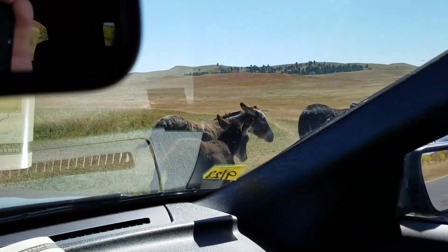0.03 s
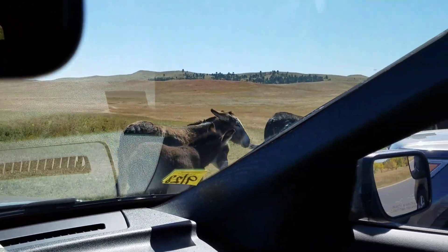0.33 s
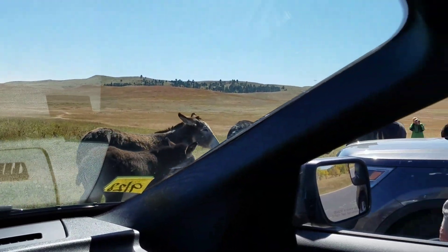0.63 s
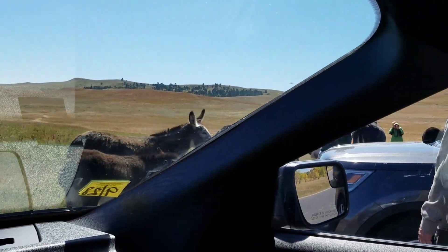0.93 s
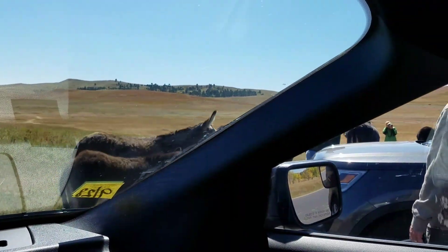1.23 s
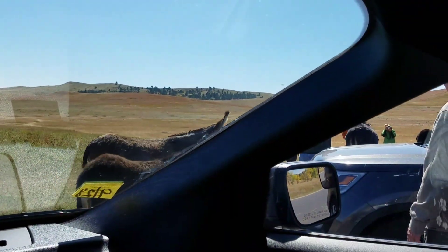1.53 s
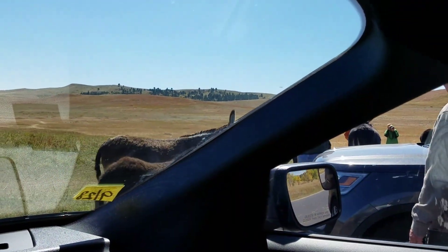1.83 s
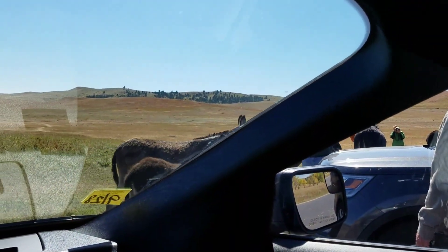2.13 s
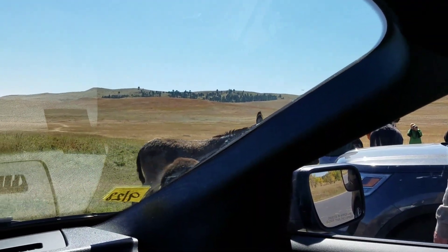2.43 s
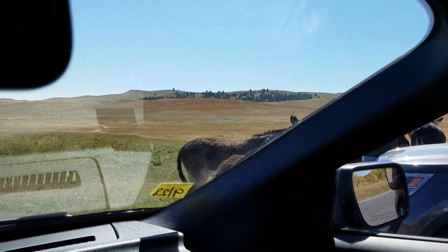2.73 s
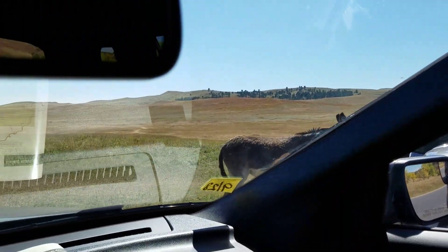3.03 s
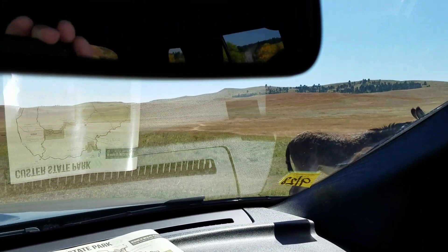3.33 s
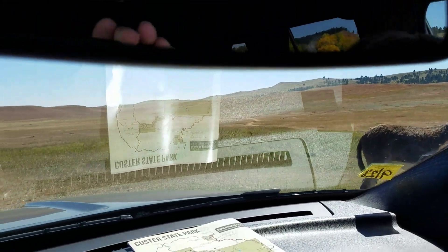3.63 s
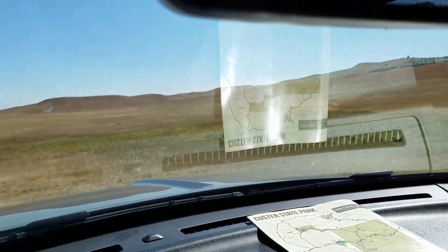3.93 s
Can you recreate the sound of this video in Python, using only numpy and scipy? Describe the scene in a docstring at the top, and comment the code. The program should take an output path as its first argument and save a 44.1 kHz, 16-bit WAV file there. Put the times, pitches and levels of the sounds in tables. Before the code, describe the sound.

Heard from the front seat, a car's electric window whirs up and thumps into its seal, shutting out the hiss from outside. The switch clicks, then the engine rumbles on under a soft ventilation hum and light handling clicks.

```python
"""A car idles under a soft ventilation hum; outside hiss pours through a window as its motor runs it up.
From 0.4 s the gap pinches shut, its resonance sweeps upward and the glass rubs into the rubber seal.
At 0.48 s hiss and motor stop and the glass thumps home, ringing the door. The switch clicks back.
The engine throbs on, with a few small handling clicks; near 3.5 s a faint drone joins under load."""
import sys
import numpy as np
from scipy import signal
from scipy.fft import rfft, irfft
from scipy.io import wavfile

SR = 44100
rng = np.random.default_rng(int(sys.argv[2]) if len(sys.argv) > 2 else 0)


def digitize_waveform(pressure):
    """Quantize a signal to 16-bit integers and store it at the path in sys.argv[1].

    Rows of a 2-D input are taken as channels; values are limited to [-1, 1].
    """
    field = np.atleast_2d(pressure).T
    bounded = np.clip(field, -1, 1)
    quanta = np.round(bounded * 32767).astype(np.int16)
    wavfile.write(sys.argv[1], SR, quanta)


N = 176400
T, HZ = np.arange(N) / SR, np.maximum(np.arange(N // 2 + 1) * SR / N, 1)


def from_db(db):
    """Decibels to gain."""
    return 10 ** (np.asarray(db) / 20)


def unit_rms(x):
    """Scale to unit rms."""
    return x / np.sqrt(np.mean(x ** 2) + 1e-20)


def in_time(rows):
    """Each column of a time table at every sample."""
    t_s, *columns = np.transpose(rows)
    return [np.interp(T, t_s, column) for column in columns]


def by_hz(rows):
    """A spectrum table at every bin, interpolated in log f."""
    hz, value = np.transpose(rows)
    return np.interp(np.log(HZ), np.log(hz), value)


def pan(db):
    """Constant-power gains for an L-R level difference."""
    gains = from_db(np.array([[.5], [-.5]]) * db)
    return gains / np.sqrt(np.mean(gains ** 2, axis=0))


def drift(corner_hz):
    """Low-passed random wander, unit rms."""
    return unit_rms(irfft(rfft(rng.standard_normal(N)) / (1 + (HZ / corner_hz) ** 2), N))


def resonance(hz, q):
    """Gain of two equal band-passes in series, at every bin."""
    return 1 / (1 + (q * (HZ / hz - hz / HZ)) ** 2)


def struck(age_s, rise_s, t60_s):
    """Envelope of a blow: quick rise, exponential decay."""
    return (1 - np.exp(-age_s / rise_s)) * from_db(-60 * np.minimum(age_s / t60_s, 4))


def tones(rows, flutter_db, wander):
    """Wavering tones; L-R phase spread grows with frequency up to 1 kHz."""
    out = 0
    for hz, db, width_hz in rows:
        phase = 2 * np.pi * np.cumsum(hz + wander * width_hz * drift(2 * width_hz + 1)) / SR
        spread_rad = min(hz / 1000, 1) * np.array([drift(3.8), drift(5.6)])
        out += np.sqrt(2) * from_db(db + flutter_db * drift(24)) * np.sin(phase + spread_rad)
    return out


# Stereo width of the noise, centred in the bass, wide in the treble: f/Hz, centring (1 = mono)
NOISE_CENTRING = [(50, 1), (130, 0.68), (290, 0.84), (640, 0.41), (1300, 0.18), (3000, -0.034),
                  (16000, -0.34)]


def noise(gain):
    """Stereo noise of given gain per root Hz, centred in the bass, wide in the treble."""
    mid, side = rfft(rng.standard_normal((2, N)))
    centring = np.clip(by_hz(NOISE_CENTRING), -.999, .999)
    spectrum = np.sqrt(1 + centring) * mid + np.sqrt(1 - centring) * side * [[1], [-1]]
    return irfft(gain * spectrum, N) * np.sqrt(SR) / 2


# Rumble and ventilation air: f/Hz, density/(dB per Hz)
CABIN_AIR = [(15, -88.5), (30, -71), (70, -73), (100, -79.5), (135, -75.5), (185, -86), (230, -78.5),
             (270, -84), (320, -82.5), (390, -83), (470, -81.5), (560, -85.5), (760, -90), (840, -95.5),
             (980, -90), (1100, -99), (1900, -102), (3000, -108), (6000, -115), (16000, -119)]
# Air balance: f/Hz, L-R/dB
CABIN_BALANCE = [(60, -4.5), (150, -0.5), (950, -2), (2400, -3.5), (6000, -2.5), (15000, 6.5)]
# Belt and ventilation hums: f/Hz, level/dB, width/Hz
CABIN_HUMS = [(103.75, -57, 1.57), (174.9, -69.5, 0.84), (207.8, -59, 0.39), (421.2, -68.5, 6),
              (705.6, -73, 1.52), (923, -73, 4.2)]


def cabin(flicker_db=1.0):
    """Rumble and ventilation air under the hums of belt drive and ventilation."""
    air = noise(from_db(by_hz(CABIN_AIR)) * pan(by_hz(CABIN_BALANCE)))
    return air * from_db(flicker_db * drift(6.9)) + tones(CABIN_HUMS, flutter_db=1.5, wander=.86)


# Engine orders: multiple of firing rate, level/dB
ENGINE_ORDERS = [(1, -36.3), (1.5, -53.5), (2, -55.5), (3, -53), (4, -64)]
# Boom over time: t/s, gain/dB
ENGINE_BOOM = [(0, 0), (.45, -1.5), (1.0, -2.5), (1.7, -2.1), (2.35, -3.8), (2.8, -3), (3.4, -2.5),
               (3.7, -0.5), (4, 1.5)]


def engine(firing_hz=30.5, speed_wander=.0043, steady_db=1.03, shake_db=2.5):
    """The firing rate booms steadily in the cabin; its higher orders shake."""
    phase = 2 * np.pi * np.cumsum(firing_hz * (1 + speed_wander * drift(3.2))) / SR
    out = 0
    for order, db in ENGINE_ORDERS:
        flutter_db = (steady_db if order == 1 else shake_db) * drift(7)
        out += from_db(db + flutter_db) * np.sin(order * phase + rng.uniform(0, 2 * np.pi))
    return np.sqrt(2) * out * from_db(in_time(ENGINE_BOOM)[0]) * pan(1.5)


def load_drone(mid_s=3.46, rise_s=.14, hz=322, level_db=-61.5):
    """A narrow cabin resonance grows as the engine takes up load."""
    swell = (1 + np.tanh((T - mid_s) / rise_s)) / 2
    return unit_rms(noise(resonance(hz, q=7.8))) * from_db(level_db) * swell


# Plastic clicks: t/s, level/dB, f/Hz, t60/s, rise/s, crack re ring/dB, L-R/dB
PLASTIC_CLICKS = [(.4635, -57, 14600, 0.027, .0005, -15, 9), (.546, -55.5, 2100, 0.056, 0.0023, -20, -2),
                  (0.589, -50.5, 2280, 0.072, 0.0012, -7.5, -6), (.588, -58.5, 11700, 0.051, .0005, -18, 5),
                  (0.597, -41, 420, 0.082, 0.0023, -30, -2), (.74, -67, 6170, 0.05, 0.0011, -8, -4),
                  (1.362, -70, 5500, 0.062, .002, 9, 0), (1.378, -57, 2030, 0.059, 0.0017, -10, -5),
                  (1.723, -66.5, 3500, 0.06, .002, -6, -6), (2.619, -63, 1380, 0.017, .0005, -14, -3),
                  (3.379, -47, 1590, 0.12, 0.00059, -25, -3), (3.384, -48.5, 755, 0.13, 0.0022, -21, -2),
                  (3.389, -59.5, 5670, 0.18, 0.0087, 0, -5),
                  (3.4155, -51.5, 5500, 0.047, 0.00067, -10.5, -3)]


def clicks(crack_low_hz=1000, crack_top_hz=6750, direct_t60_s=.014):
    """Switch and handling clicks: a broad crack and one ring, direct and then scattered by the cabin."""
    out = np.zeros((2, N))
    crack = unit_rms(noise(HZ / (HZ + crack_low_hz) / np.sqrt(1 + (HZ / crack_top_hz) ** 6)))
    for t_s, db, hz, t60_s, rise_s, crack_db, pan_db in PLASTIC_CLICKS:
        age_s = np.maximum(T - t_s, 0)
        body = unit_rms(noise(resonance(hz, q=2.67))) + from_db(crack_db) * crack
        envelope = struck(age_s, rise_s, direct_t60_s) + struck(age_s, rise_s, t60_s)
        out += body * envelope * from_db(db) * pan(pan_db)
    return out


# Motor pitch: t/s, f/Hz
MOTOR_PITCH = [(0, 508), (.2, 508), (.32, 508.3), (.39, 499), (.45, 487.5), (.49, 450)]
# Motor harmonics: multiple, level/dB, L-R/dB
MOTOR_HARMONICS = [(1, -60, 31), (2, -72, -10), (3, -65.5, -16)]


def window_motor(jitter=.003, flutter_db=2):
    """The motor whines, slowing as the glass meets the seal."""
    phase = 2 * np.pi * np.cumsum(in_time(MOTOR_PITCH)[0] * (1 + jitter * drift(30))) / SR
    return sum(np.sqrt(2) * from_db(db + flutter_db * drift(27)) * np.sin(k * phase) * pan(pan_db)
               for k, db, pan_db in MOTOR_HARMONICS)


# Outside hiss: f/Hz, density/(dB per Hz)
GAP_AIR = [(100, -90), (300, -78.5), (600, -91), (1050, -89.5), (1330, -98), (1600, -90.5), (2300, -92),
           (4100, -89.5), (5200, -99), (7700, -102), (9000, -111), (12000, -109), (15000, -109)]
# Hiss balance: f/Hz, L-R/dB
GAP_BALANCE = [(300, -2.5), (950, -6), (2400, -3.5), (6000, -5.5), (12000, 3)]
# Whines on the hiss: f/Hz, level/dB, width/Hz
GAP_WHINES = [(2326, -70, 15), (2194, -76, 8), (2320, -81, 7.2), (2513, -76, 8), (2760, -78, 8.6),
              (2928, -79, 16), (3350, -94, 8)]


def gap_hiss():
    """Outside hiss enters through the open gap, carrying thin whines."""
    hiss = noise(from_db(by_hz(GAP_AIR)) * pan(by_hz(GAP_BALANCE)))
    return hiss + tones(GAP_WHINES, flutter_db=2.5, wander=1) * pan(-5)


# Gap resonance: t/s, level/dB (before gain_db), f/Hz
PINCH_SWEEP = [(.39, -72, 2400), (.425, -58, 2700), (.447, -49, 3300), (.459, -48, 4700), (.471, -53, 6400),
               (.487, -60, 6600), (.515, -80, 6600)]


def gap_pinch(q=3.9, gain_db=-3.5, skirt_db=-37, rough_db=3.5, block=64):
    """Air squeezed by the closing gap: its resonance swells and sweeps upward."""
    db, hz = in_time(PINCH_SWEEP)
    white = rng.standard_normal((2, N))
    out, state = np.zeros((2, N)), np.zeros((2, 2))
    for i in range(0, int(PINCH_SWEEP[-1][0] * SR), block):
        radius = np.exp(-np.pi * hz[i] / q / SR)
        b = np.sqrt((1 - radius ** 2) / 2) * np.array([1, 0, -1])
        a = [1, -2 * radius * np.cos(2 * np.pi * hz[i] / SR), radius ** 2]
        band, state = signal.lfilter(b, a, white[:, i:i + block], zi=state)
        out[:, i:i + block] = band + from_db(skirt_db) * white[:, i:i + block]
    return out * from_db(gain_db + db - rough_db * drift(150)) * pan(-4.5)


def seal_rub(peak_s=.446, swell_s=.025, fade_s=.022, level_db=-41.5):
    """Rubber swishes and squeaks against the glass, swelling until the edge is in the channel."""
    envelope = np.exp(-np.maximum(peak_s - T, 0) / swell_s - np.maximum(T - peak_s, 0) / fade_s)
    swish = resonance(hz=2320, q=.99)
    squeak = from_db(-4) * resonance(hz=2300, q=9) + from_db(-8) * resonance(hz=2800, q=9)
    return unit_rms(noise(swish + squeak)) * envelope * from_db(level_db) * pan(-6)


# Glass seating, door shuddering: t/s, level/dB
GLASS_KNOCKS = [(.4845, -18.5), (.5035, -21.5), (.531, -19), (.614, -30), (.672, -42)]
# Door modes: f/Hz, gain/dB, t60/s
DOOR_MODES = [(46.3, -6, 0.29), (101, 2, .13), (111, -13, .12), (231, -8.5, 0.13), (290, -13.5, .08),
              (407.6, -21.5, .1), (480, -20.5, .1)]
# Trim rattle: f/Hz, density/(dB per Hz)
TRIM_RATTLE = [(160, -81), (260, -60), (350, -66.5), (600, -71.5), (1200, -85), (2300, -84), (3000, -101),
               (8000, -118)]


def door_thump(rise_s=.003, soften_s=.0029, loss_db_per_oct=6, lowpass_hz=700, left_lag_s=.00051):
    """The glass knocks the door into ringing and rattles its trim; the seal dulls each knock further."""
    rings = np.zeros((2, N))
    ear_time_s = T - np.array([[left_lag_s], [0]])
    for k, (t_s, db) in enumerate(GLASS_KNOCKS):
        span = slice(int(t_s * SR), int((t_s + .5) * SR))
        age_s = np.maximum(ear_time_s[:, span] - t_s, 0)
        for hz, mode_db, t60_s in DOOR_MODES:
            loss_db = k * loss_db_per_oct * max(np.log2(hz / DOOR_MODES[1][0]), 0)
            envelope = struck(age_s, rise_s + k * soften_s, t60_s)
            rings[:, span] += from_db(db + mode_db - loss_db) * envelope * np.sin(2 * np.pi * hz * age_s)
    thud = signal.sosfilt(signal.butter(2, lowpass_hz, fs=SR, output="sos"), rings + 1e-18)
    trim_age_s = np.maximum(T - GLASS_KNOCKS[0][0] + rise_s, 0)
    trim = noise(from_db(by_hz(TRIM_RATTLE))) * struck(trim_age_s, rise_s, t60_s=.23)
    return (thud + trim) * pan(-1)


def scene(shut_s=.484, shut_fade_s=.0053):
    """The mix at the front seat; motor and hiss end as the glass seals."""
    until_shut = (1 - np.tanh((T - shut_s) / shut_fade_s)) / 2
    idle = engine() + cabin()
    window = (window_motor() + gap_hiss()) * until_shut + gap_pinch() + seal_rub() + door_thump()
    return idle + window + clicks() + load_drone()


# Microphone self-noise: f/Hz, density/(dB per Hz)
MIC_NOISE = [(1000, -125), (7000, -120), (10500, -116), (12500, -112), (15500, -108)]
# Microphone response: f/Hz, gain/dB
MIC_RESPONSE = [(7700, 0), (8500, -6), (9500, -4.5), (11000, -3), (12000, 1)]


def record(dry, cutoff_hz=15750):
    """Microphone hiss and colour, then a steep low-pass."""
    spectrum = rfft(dry + noise(from_db(by_hz(MIC_NOISE))), 2 * N)
    hz = np.maximum(np.arange(N + 1) * SR / (2 * N), 1)
    colour = from_db(np.interp(hz, HZ, by_hz(MIC_RESPONSE)))
    lowpass = 1 / np.sqrt(1 + (hz / cutoff_hz) ** 300)
    return irfft(spectrum * colour * lowpass)[:, :N]


dry = scene()
out = record(dry)
digitize_waveform(out)
```